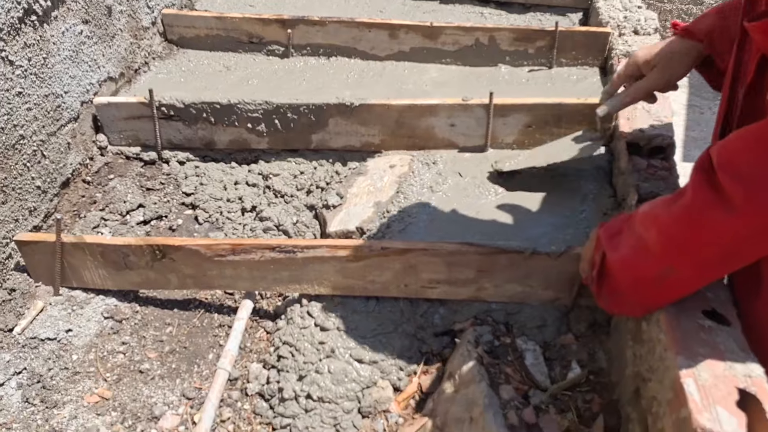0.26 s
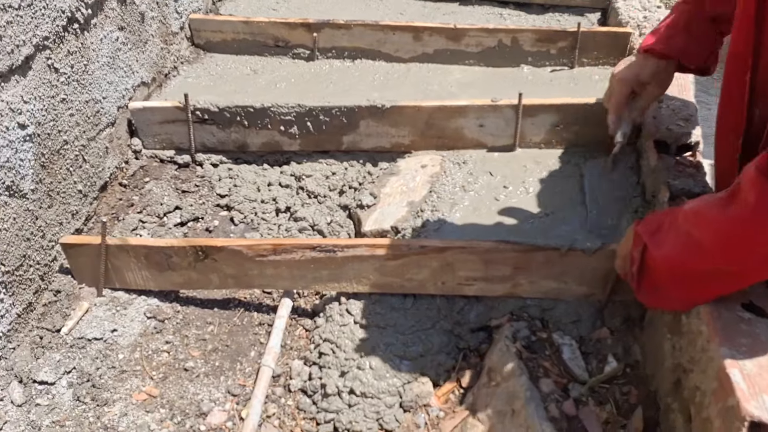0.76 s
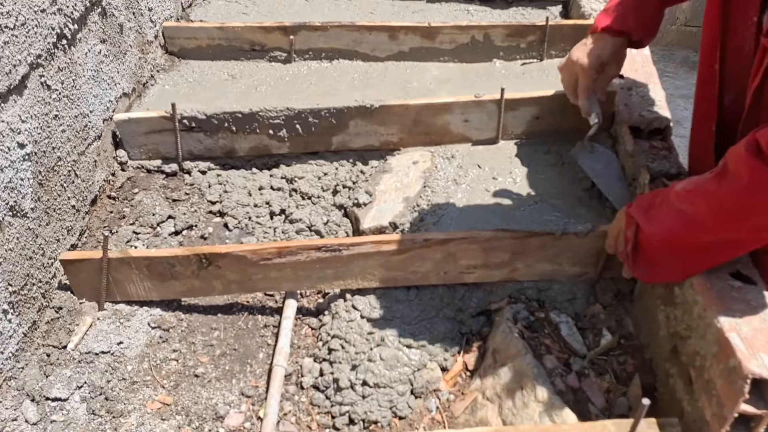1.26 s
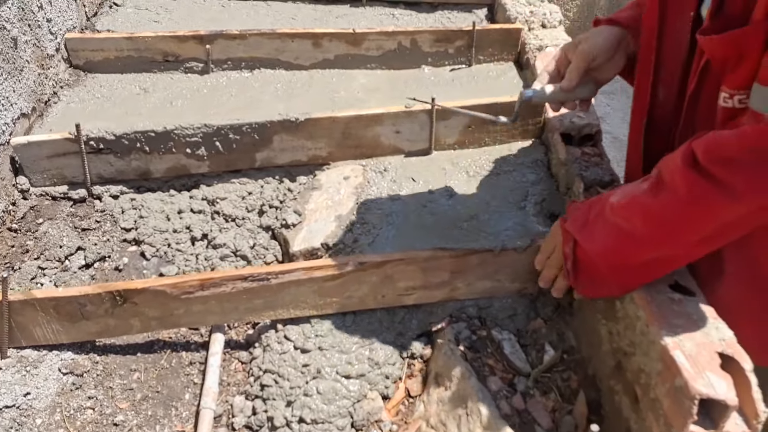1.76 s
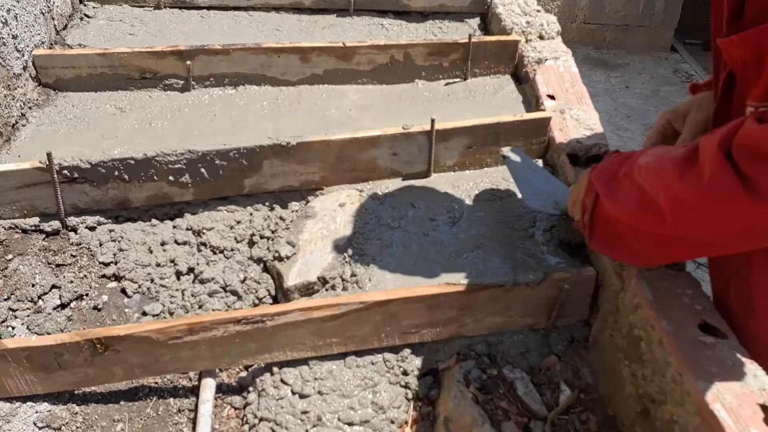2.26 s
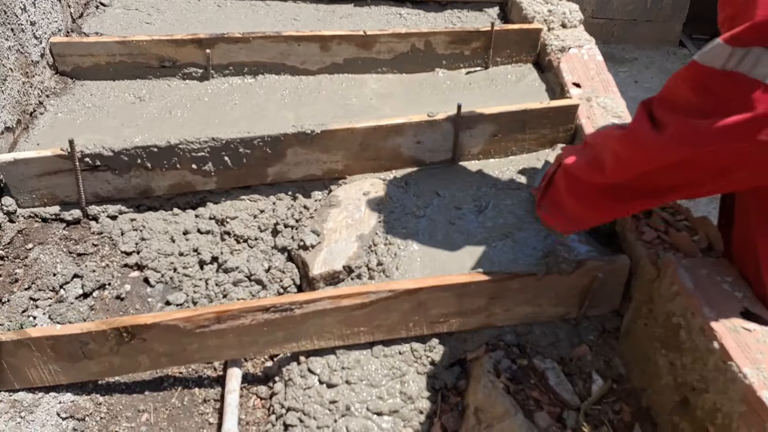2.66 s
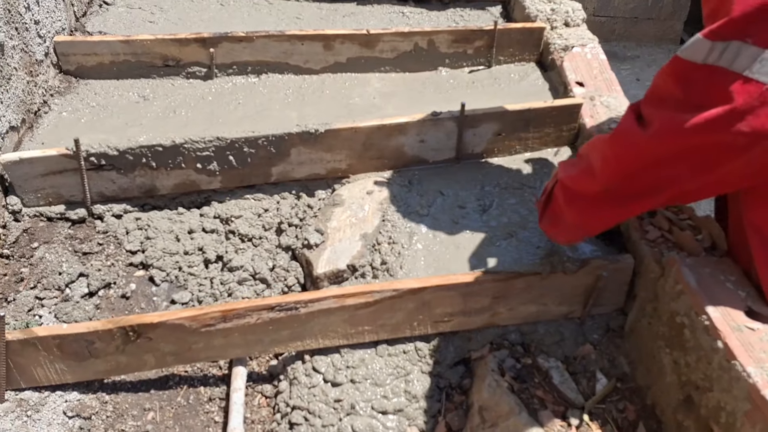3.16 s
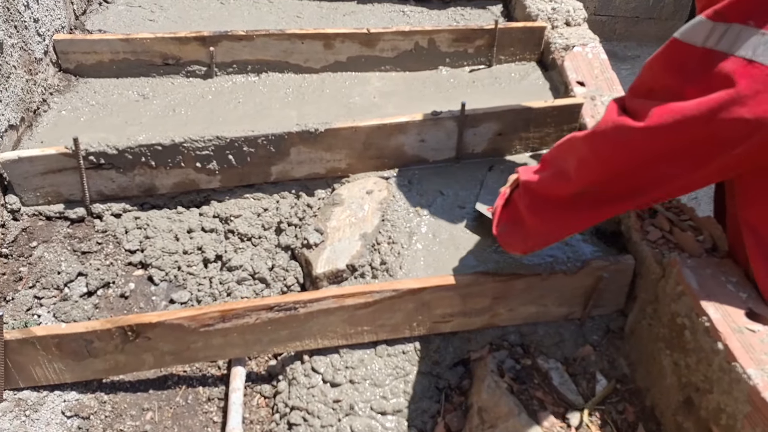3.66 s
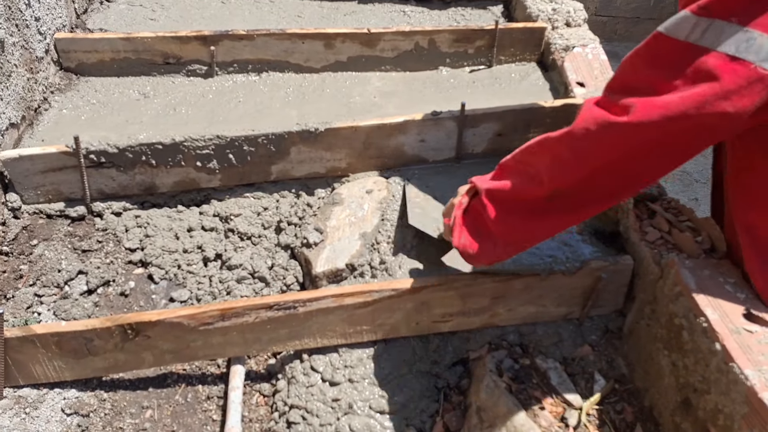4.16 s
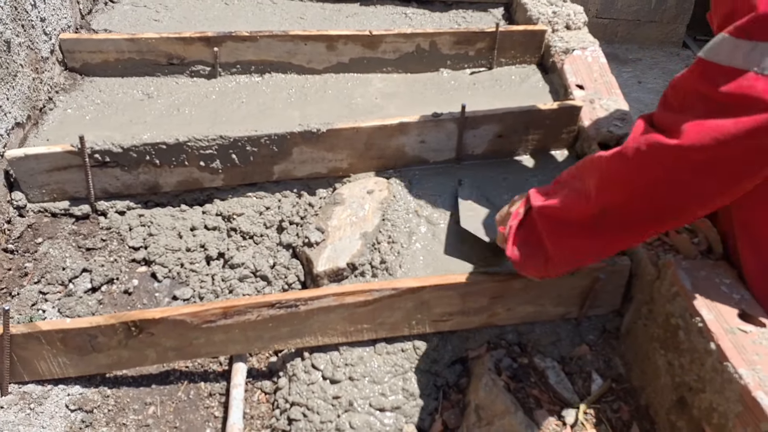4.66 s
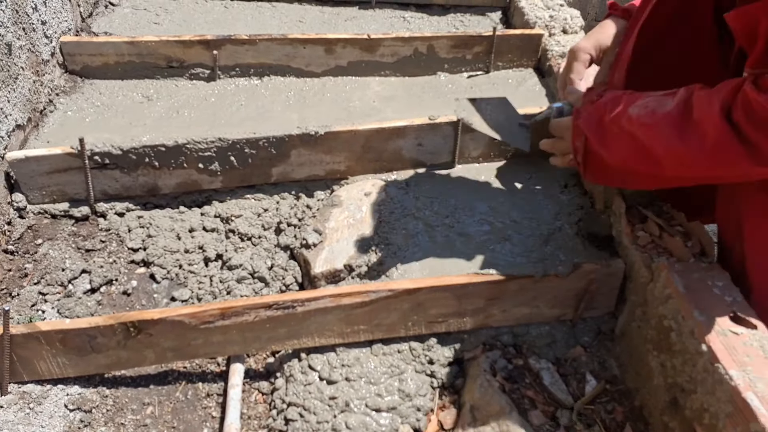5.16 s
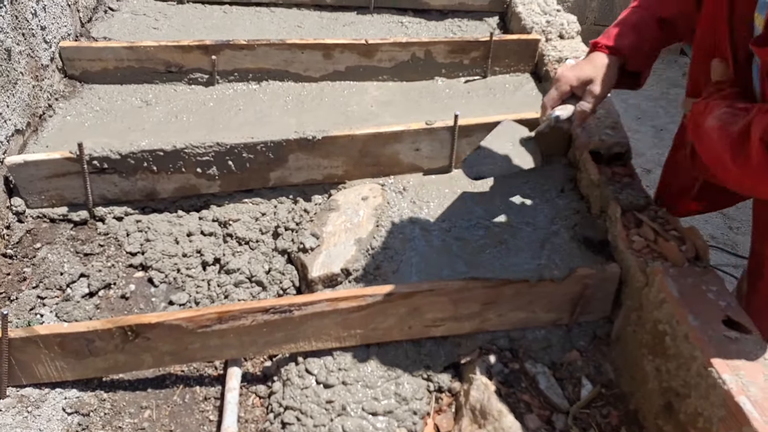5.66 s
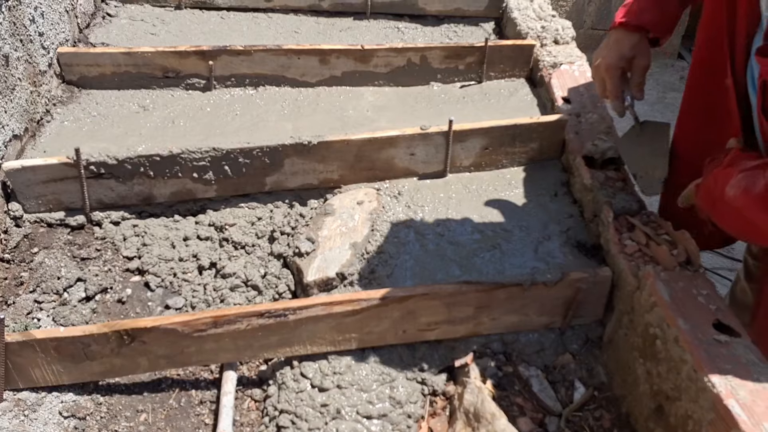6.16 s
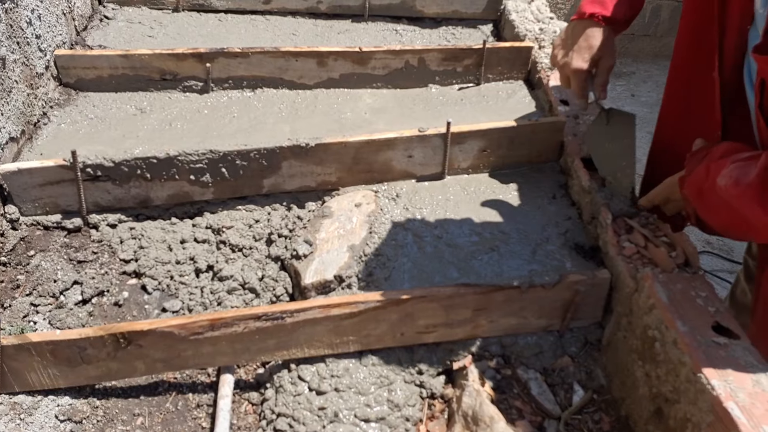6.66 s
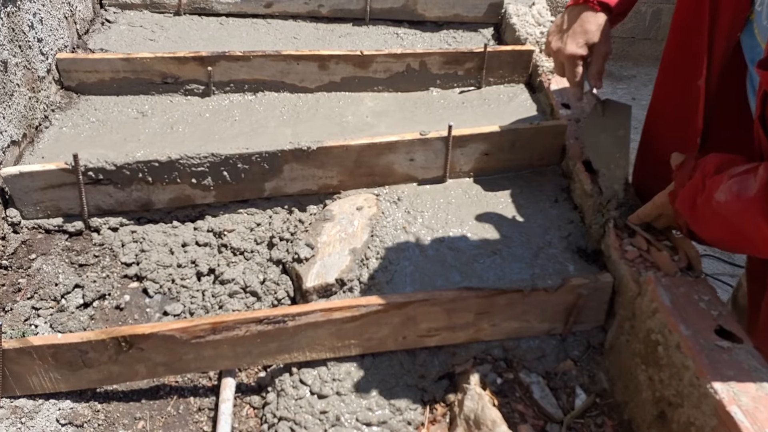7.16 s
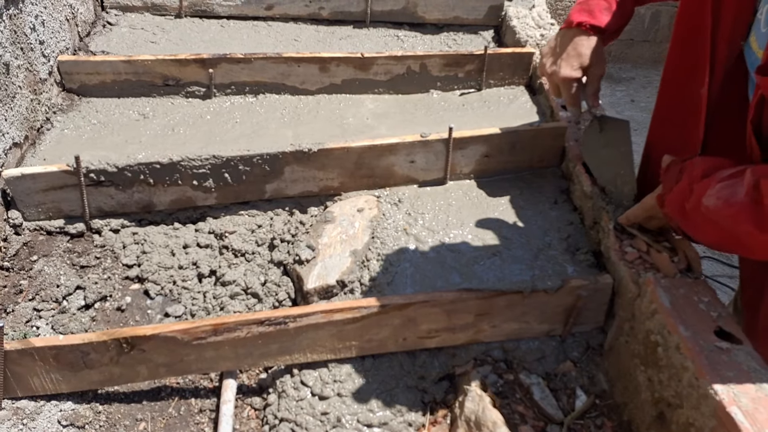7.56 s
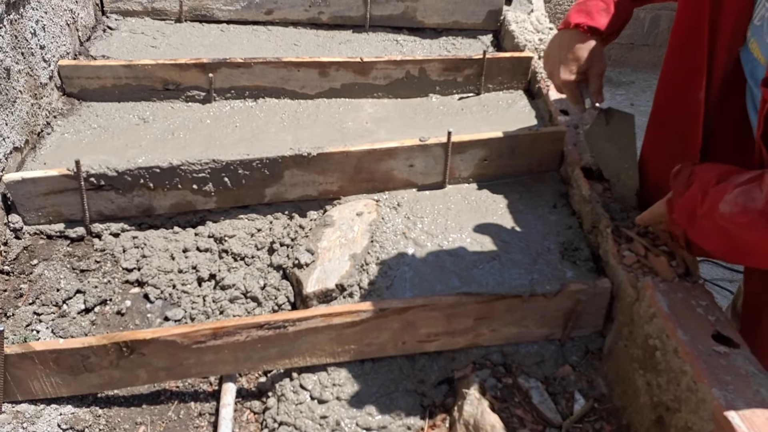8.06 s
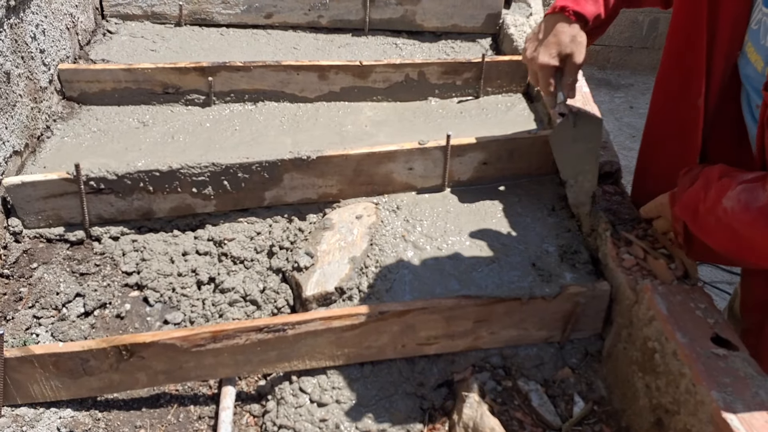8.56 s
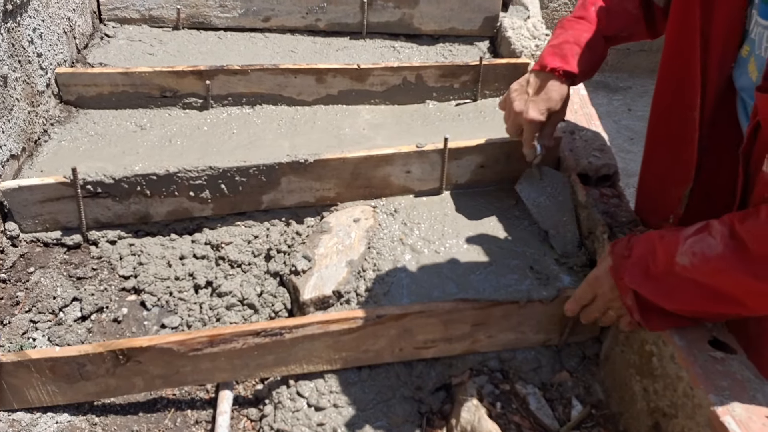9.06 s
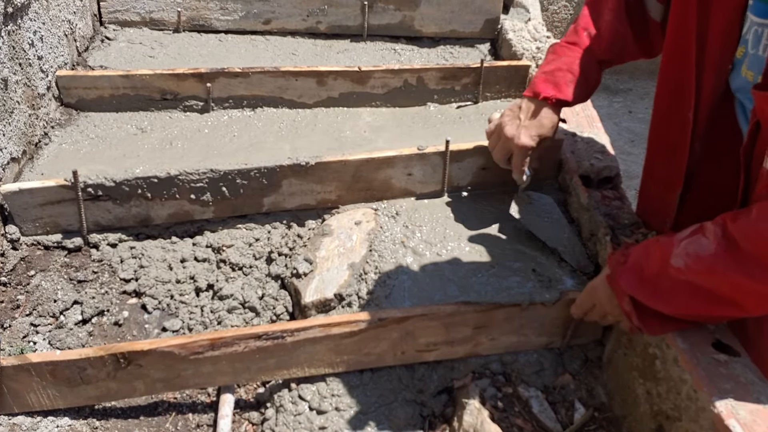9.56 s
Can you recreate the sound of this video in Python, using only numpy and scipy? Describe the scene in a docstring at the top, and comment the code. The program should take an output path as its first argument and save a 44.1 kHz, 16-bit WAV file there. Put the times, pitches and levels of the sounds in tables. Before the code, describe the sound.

A trowel blade works gritty wet mix beside hollow brick on an open building site. Dry, short, uneven scrapes alternate with near-silence: a hard knock first, rattling taps and bright sandy swipes next, a slow rising drag in the middle, stony grinding with hollow resonance later, then soft ringing rubs. The microphones are fairly near, wide in stereo, with a low steady hum, a very thin high whine and soft air noise behind.

```python
"""Outdoors on a building site, a steel trowel spreads wet concrete and scrapes along hollow bricks.
Stones, grit and sand grind as shaped noise under the blade; taps, knocks and light rubbing ring its modes.
Brick cavities ring with each slip of the edge, boards rumble, and dull blows are short damped swings.
Behind the work a distant machine hums and whines with wavering sines over patchy noise of traffic and air."""
import sys
import numpy as np
from scipy import signal
from scipy.fft import rfft, irfft, next_fast_len
from scipy.io import wavfile

SR = 44100
rng = np.random.default_rng(int(sys.argv[2]) if len(sys.argv) > 2 else 0)


def file_out(sig):
    """Save sig as 16-bit WAV at sys.argv[1]."""
    # one column per channel
    cols = np.atleast_2d(sig).T
    # limit, then scale
    lim = np.clip(cols, -1, 1)
    pcm = np.round(lim * 32767).astype(np.int16)
    wavfile.write(sys.argv[1], SR, pcm)


N = 433062   # length [samples]

# the edge meets stones: (time [s], relative level [dB], treble over it [dB], time to fade by 60 dB [s])
TAPS = [(0.722, -6, -10, 0.075), (0.7488, -14, 10, 0.052), (1.046, -25, 1, 0.081), (1.313, -20, -10, 0.054),
        (2.5255, -29.5, 7, 0.033), (2.7806, -23.5, 9, 0.041), (2.797, -6, -11, 0.059),
        (2.9019, -14.5, -4, 0.055), (2.9855, -13, 4.5, 0.038), (3.063, -20.5, -7, 0.08),
        (3.081, -23.5, 4.5, 0.035), (3.154, -13.5, -6, 0.061), (3.245, -23, -3, 0.036),
        (4.5309, -23, -4.5, 0.025), (5.748, -24.5, -12, 0.088), (6.2085, -30.5, 3, 0.14),
        (7.538, -27.5, -22, 0.045), (7.6662, -24, -11, 0.027), (9.575, -17, -7.5, 0.042)]
# ringing modes of the steel blade:
# (pitch [Hz], level pressed down [dB], level held loosely [dB], free time to fade by 60 dB [s])
BLADE = [(1180, -3, -12, .15), (1370, -2, -20, .15), (1720, -9, -20, .1), (1950, -4, -20, .1),
         (2300, -5, -11, .1), (2610, -5, -4, .08), (3290, -6, -6, .1), (3700, -6, -10, .1),
         (4130, -6, -8, .1), (4640, -5, -9, .1), (5130, -5, -7, .1), (5750, -8, -14, .1)]
TAP_TILT_DB = -3   # struck modes get weaker by this per octave above 1 kHz
TURN_RAD = 1.305   # phase turn between the two sides


def amp(db):
    """Turn decibels into gain."""
    return np.exp(np.asarray(db) * (np.log(10) / 20))


def rms_one(x):
    """Scale to an rms level of 1."""
    return x / np.sqrt(np.mean(x ** 2) + 1e-20)


def in_time(rows):
    """Read each column of a table whose first column is time, sample by sample."""
    s, *columns = np.transpose(rows)
    return [np.interp(np.arange(N) / SR, s, column) for column in columns]


def at_hz(points, hz):
    """Read a spectrum table along a logarithmic pitch axis."""
    points = np.array(points)
    return np.interp(np.log(hz), np.log(np.maximum(points[:, 0], 1)), points[:, 1])


def colour(x, points):
    """Filter x by the spectrum table, nearly silent beyond its ends, and scale to rms 1."""
    size = next_fast_len(N)
    hz = np.maximum(np.arange(size // 2 + 1) * SR / size, 1)
    below, above = (points[0][0] * .8, -70), (points[-1][0] * 1.15, -70)
    gain = amp(at_hz([below] + list(points) + [above], hz))
    return rms_one(irfft(rfft(x, size) * gain, size)[..., :N])


def drift(rate):
    """Make a slow random curve of rms 1; a higher rate [Hz] wanders faster."""
    step = 40   # samples between its points
    r = np.exp(-2 * np.pi * rate * step / SR)
    noise = rng.standard_normal(N // step + 2002)
    slow = signal.lfilter([1], [1, -2 * r, r * r], noise)[2000:]   # skip the start-up
    return np.interp(np.arange(N) / step, np.arange(len(slow)), rms_one(slow))


def ring(x, hz, t60):
    """Let x strike a resonance: a unit click starts a sine that fades by 60 dB in t60 seconds."""
    r, w = amp(-60 / (t60 * SR)), 2 * np.pi * hz / SR
    return signal.lfilter([0, np.sin(w)], [1, -2 * r * np.cos(w), r * r], x + 1e-18)


def grains(per_s, spread_db):
    """Draw random clicks of uneven size, one shared track and one for each side."""
    sizes = amp(spread_db * np.minimum(rng.exponential(1, (3, N)), 4.5))
    signs = rng.choice([-1, 1], (3, N))
    present = rng.random((3, N)) < per_s / SR
    return rms_one(sizes * signs * present)


def swells(rows):
    """Give the gain of gestures that rise, hold and fall, and the row that began last at each moment."""
    rise_power, fall_power = 0.84, 1.18   # bend of the rise in gain and of the fall in dB
    fall_db = 30   # lost by the end of the fall time
    t, power = np.arange(N) / SR, np.zeros(N)
    for start, rise, hold, fall, db, *_ in rows:
        rise, hold, fall = np.maximum([rise, hold, fall], [.002, 0, .01])
        span = slice(round(start * SR), round((start + rise + hold + 2 * fall) * SR))
        since = np.maximum(t[span] - start, 0)
        fallen_db = fall_db * (np.maximum(since - rise - hold, 0) / fall) ** fall_power
        risen = np.minimum(since / rise, 1) ** rise_power
        power[span] += (risen * amp(db - fallen_db)) ** 2   # overlapping gestures add in power
    rows = np.array(rows)
    latest = np.maximum(np.searchsorted(rows[:, 0], t, side="right") - 1, 0)
    return np.sqrt(power), rows[latest].T


def gliding(rows):
    """Give the gain and phase of gestures whose pitch glides for up to half a second."""
    level, (start, *_, first_hz, glide) = swells(rows)
    hz = first_hz + glide * np.clip(np.arange(N) / SR - start, 0, .5)
    return level, 2 * np.pi * np.cumsum(hz) / SR


def bursts(levels_db, rise_s):
    """Shape each tap as a quick rise and an exponential fall."""
    out = np.zeros(N)
    for (s, _, _, t60), db in zip(TAPS, levels_db):
        first = round(s * SR)
        t = np.arange(min(int(.25 * SR), N - first)) / SR
        out[first:][:len(t)] += amp(db - 60 * t / max(t60, .01)) * (1 - np.exp(-t / rise_s))
    return out


def pressed_blade(x):
    """Grinding excites the damped blade modes, each wavering as the grip and angle change."""
    wet_damping = .35   # share of the ring time left while the blade touches concrete
    rings = 0
    for hz, pressed_db, _, t60 in BLADE:
        rings = rings + amp(pressed_db + 5 * drift(9)) * rms_one(ring(x, hz, t60 * wet_damping))
    return rms_one(rings) * np.sqrt(np.mean(x ** 2))   # as strong as the grinding itself


def scraping():
    """Random clicks of stones, grit and sand grind under uneven pressure; taps add short crunches."""
    # the blade grinds: (start [s], rise [s], hold [s], fall [s], relative pressure [dB],
    # fine sand over it [dB], coarse stones over it [dB])
    strokes = [(0, 0.0014, 0.063, 0.062, -31, 0.5, 0.5), (.075, 0.0089, 0.064, 0.22, -34.5, -3.5, -1.5),
               (.7, 0.028, 0.0079, 0.071, -23.5, -6.5, 0), (.745, 0.049, 0.014, 0.23, -28, -1.5, -2.5),
               (1.04, 0.0037, 0.13, 0.085, -45, 1, 0), (1.305, 0.0035, 0.0028, 0.3, -39, 2, 1),
               (1.34, 0.011, 0.12, 0.21, -49, 2, -12), (1.585, 0.013, 0.015, 0.27, -35, -4.5, -4.5),
               (1.99, 0.02, 0.095, 0.12, -52, -1.5, -23), (2.518, 0.065, 0.079, 0.087, -34.5, 1.34, -2.5),
               (2.772, 0.013, .001, 0.27, -33, 0, -13), (2.98, 0.0085, 0.072, 0.19, -39, -1.5, -7),
               (3.04, 0.043, 0.05, 0.035, -40, 0.5, -8), (3.14, 0.0066, 0.22, 0.32, -45, -1, -2.5),
               (3.42, 0.057, 0.036, .1, -30, 0, -4), (3.49, 0.053, 0.01, 0.12, -21.5, 0.5, -8),
               (3.6, 0.026, 0.042, 0.031, -38.5, 0.5, -7), (3.82, 0.014, 0.021, 0.25, -37.5, -18, 11.5),
               (3.885, 0.076, 0.044, 0.1, -32.5, 2, 3.5), (3.95, 0.022, 0.036, 0.21, -24, 1, -10),
               (4.05, 0.035, 0.065, 0.02, -36, 1.5, 0), (4.335, 0.019, 0.01, 0.14, -42, -11, 6.5),
               (4.525, 0.07, 0.066, 0.043, -33.5, 1, -1.5), (5.25, 0.034, 0.018, 0.23, -51, -2, -1),
               (5.69, 0.22, .001, .27, -20.5, -3.5, 0.5), (6.6, 0.047, 0.059, 0.15, -52, 1.5, 6),
               (6.885, 0.019, .001, 0.17, -45, 0.5, 7.5), (6.99, 0.031, 0.029, 0.15, -36.5, -9, -2),
               (7.09, 0.034, .001, 0.18, -28.5, -9, 9.5), (7.17, 0.07, 0.0011, 0.25, -30, -5.5, 4.5),
               (7.44, 0.031, 0.008, 0.055, -42, 1, -2.5), (7.65, 0.039, 0.0019, 0.12, -40, -0.5, -3),
               (7.97, 0.0086, 0.024, 0.11, -37, -2, 4), (8.02, 0.091, .001, 0.41, -24, -4, 1),
               (8.13, 0.066, .001, 0.24, -18.5, -4.5, -0.5), (8.27, 0.051, .001, 0.14, -24.5, -6.5, -2.5),
               (8.865, 0.01, 0.13, 0.24, -49, 1, -33), (9.025, 0.028, 0.05, 0.078, -33, 0, -20),
               (9.31, 0.012, .001, 0.17, -45, 0, -3.5), (9.41, 0.033, 0.096, 0.1, -40, -4, 0),
               (9.57, 0.0032, .001, 0.19, -42, 0.5, -4)]
    # spectrum of the grit: (pitch [Hz], level per Hz [dB])
    grit_points = [(650, -14), (1100, -5), (1660, 2.5), (2480, 9), (3300, -2), (4290, -4), (7260, -120)]
    # spectrum of the sharp grit: (pitch [Hz], level per Hz [dB])
    sharp_points = [(3000, -19), (4030, -4.5), (4780, -0.5), (6100, -0.5), (7600, -46.5)]
    # spectrum of the fine sand: (pitch [Hz], level per Hz [dB])
    sand_points = [(3710, -4), (6300, -7.5), (9840, -9.5), (13700, -7.5), (15600, -9)]
    # spectrum of the coarse stones: (pitch [Hz], level per Hz [dB])
    stone_points = [(330, -15.5), (500, -4), (1300, -2), (1690, 3), (2860, -120)]
    flat_from_s, flat_to_s = 2.4, 5.5   # strokes begun in this span lie flat on the wet mix
    flat_sharp_db = 5.0   # flat strokes have stronger sharp grit

    pressure, (start, *_, sand_db, stone_db) = swells(strokes)
    flat = (start > flat_from_s) & (start < flat_to_s)
    sharp_db = -1.5 + sand_db + flat_sharp_db * flat   # sharp grit comes with fine sand
    _, tap_db, treble_db, _ = np.array(TAPS).T
    stroke = pressure * amp(-7.5 + 0.84 * drift(43))   # lumpy contact
    contact = stroke + bursts(tap_db - 12, rise_s=0.013)

    crushed = grains(7000, 3.3)
    grit = colour(crushed, grit_points) * amp(2.5 * drift(40))
    sharp = colour(crushed, sharp_points) * amp(sharp_db + 2.5 * drift(15))
    rubbed = (grit + sharp) * contact
    ringing = amp(-5) * pressed_blade(rubbed)

    sand = colour(grains(9000, 3.5), sand_points)
    dull = signal.lfilter(*signal.butter(2, 9500, fs=SR), sand)
    # where sand is scarce, the finest grains are scarcest
    sand = dull + (sand - dull) * amp(1.83 * sand_db)
    sand_bursts = bursts(tap_db + treble_db - 9, rise_s=0.000076)
    sand = sand * (stroke * amp(sand_db) + sand_bursts)

    stones = colour(grains(2500, 2.4), stone_points) * contact
    stones = stones * amp(stone_db + 2.23 * drift(22.7))
    return rubbed + ringing + sand + stones


def struck_blade():
    """Each tap strikes every mode of the blade by a random strength, and contact damps the ring."""
    ring_db, spread_db = -15, 5.5   # level offset and random spread of each mode
    damping = .4   # share of the ring time left
    s, db = np.array(TAPS).T[:2]
    chance, out = rng.standard_normal((len(s), len(BLADE))), 0
    for (hz, pressed_db, _, t60), luck in zip(BLADE, chance.T):
        tilt_db = TAP_TILT_DB * np.log2(hz / 1000)
        clicks = np.zeros(N)
        clicks[(s * SR).astype(int) + 40] = amp(db + pressed_db + ring_db + tilt_db + spread_db * luck)
        out = out + ring(clicks, hz, t60 * damping)
    return signal.lfilter(*signal.butter(2, 800, "high", fs=SR), out)


def clinks():
    """Each clean knock on the lifted blade leaves a few modes ringing as fading sines."""
    # (time [s], relative level of a mode at 1 kHz [dB], ring time over the mode's own [times],
    # pitches struck [Hz])
    knocks = [(.722, -20, .9, (1890, 2390)), (1.311, -29, .4, (1370, 1950, 2300)),
              (4.343, -42, 3.6, (1165, 1378, 1770, 2400, 3190)), (4.528, -29, .4, (3700, 4640, 5600)),
              (4.62, -40, 2.8, (1240,)), (6.2105, -31, .5, (1140, 1690, 3660, 4300, 5730))]
    out, t = np.zeros(N), np.arange(int(.3 * SR)) / SR
    for s, db, longer, struck in knocks:
        for hz in struck:
            nearest = min(BLADE, key=lambda mode: abs(mode[0] - hz))
            t60 = longer * nearest[3]
            fade = amp(db + TAP_TILT_DB * np.log2(hz / 1000) - 60 * t / t60)
            tone = np.sin(2 * np.pi * (hz * t + rng.random()))
            out[round(s * SR):][:len(t)] += fade * tone * np.minimum(t / 0.0029, 1)
    return out


def singing():
    """Light rubbing keeps the loosely held blade sounding; bending glides its wavering lowest mode."""
    # (start [s], rise [s], hold [s], fall [s], relative level [dB], lowest pitch [Hz], glide [Hz/s])
    songs = [(7.655, 0.01, 0.091, 0.06, -53, 1177, 1), (8.862, 0.029, 0.11, .12, -49.5, 1190, 25),
             (9.025, 0.04, 0.033, 0.15, -42, 1225, 27)]
    level, phase = gliding(songs)
    rubbing = grains(900, 3.0)
    r = amp(-60 / (.07 * SR))
    # slow strength and phase of the lowest mode, as one complex signal
    swell = signal.lfilter([1], [1, -r], rubbing[0] + 1j * rubbing[1])
    steady = .4 * np.std(swell)
    lowest = rms_one(np.real((swell + steady) * np.exp(1j * phase)))
    upper = 0
    for hz, _, loose_db, t60 in BLADE:
        upper = upper + amp(loose_db + 3 * drift(20)) * rms_one(ring(rubbing[2], hz, t60))
    return level * (lowest + upper)


def hollow():
    """Slips of the edge excite the air cavities of the brick, and the boards rumble along."""
    # (start [s], rise [s], hold [s], fall [s], relative level [dB], rumble of the boards over it [dB])
    rubs = [(0, 0.0054, 0.099, 0.22, -48, 2.5), (.645, 0.023, 0.11, 0.23, -41, -3),
            (3.325, 0.01, 0.043, 0.085, -39.5, -12), (3.81, 0.019, 0.0011, 0.21, -39.5, -4),
            (5.8, 0.24, 0.042, 0.11, -37, -3.5), (6.99, 0.044, 0.27, 0.13, -31, -14.5),
            (7.893, 0.0056, 0.0092, 0.29, -40.5, 2), (8.0, 0.23, .03, 0.24, -46.5, 5.5),
            (9.408, 0.003, 0.1, 0.17, -35.5, -6)]
    # air cavities of the brick: (pitch [Hz], width [Hz], relative level [dB])
    cavity_modes = [(276, 21, -7), (356, 39, 7), (571, 56, 0)]
    level, (*_, rumble_db) = swells(rubs)
    slips = grains(350, 3.6)
    cavity = 0
    for hz, width, db in cavity_modes:
        cavity = cavity + amp(db + 0.47 * drift(13.0)) * rms_one(ring(slips[0], hz, 1.6 / width))
    cavity = colour(cavity, [(190, -3.0), (900, -6.5)])
    rumble = colour(slips[1], [(40, -7), (70, 11.0), (220, 3.5)])
    return level * (cavity + amp(rumble_db) * rumble)


def thuds():
    """Each dull blow on boards or brick is a low damped swing with a short rough knock of noise."""
    # (time [s], relative level [dB], pitch [Hz], time to fade by 60 dB [s], relative knock level [dB])
    blows = [(0.723, -15, 109.5, 0.12, -32), (0.745, -18, 93, 0.14, -34), (2.567, -26, 494, 0.032, -43),
             (7.897, -10, 149, 0.022, -20.5), (9.414, -22, 70, 0.17, -21)]
    out, t = np.zeros(N), np.arange(int(.3 * SR)) / SR
    for s, db, hz, t60, knock_db in blows:
        rough = signal.lfilter(*signal.butter(2, 900, fs=SR), rng.standard_normal(len(t)))
        knock = rough * amp(knock_db - 60 * t / 0.18)
        fade = amp(-60 * t / max(t60, .02)) * (1 - np.exp(-t / 0.0031))
        swing = np.sin(2 * np.pi * hz * t) * fade
        out[round(s * SR):][:len(t)] += amp(db) * swing + knock
    return out


def boom():
    """Soft low sines swell and sag in pitch."""
    # (start [s], rise [s], hold [s], fall [s], relative level [dB], first pitch [Hz], glide [Hz/s])
    low_tones = [(2.82, 0.064, 0.033, 0.19, -34.5, 103.1, -150),
                 (7.094, 0.0183, 0.0053, 0.034, -12, 361, -100)]
    level, phase = gliding(low_tones)
    return level * np.sin(phase)


def whistles():
    """Noise through narrow resonances makes breathy tones that swell and fade."""
    # the low ones lie under scrapes: (start [s], end [s], pitch [Hz], relative level [dB])
    breathy_tones = [(4.84, 5.2, 2820, -55), (5.16, 5.25, 2190, -56), (5.736, 5.913, 720, -32),
                     (6.6, 6.745, 4720, -52), (7.11, 7.22, 280, -30), (7.797, 7.83, 1200, -46)]
    out, air, flutter_db = np.zeros(N), rng.standard_normal(N), 1.6 * drift(25)
    for start, end, hz, db in breathy_tones:
        span = slice(round(start * SR), round(end * SR))
        tone = rms_one(ring(air, hz, min(0.049, 60.0 / hz)))[span]
        fade = np.hanning(span.stop - span.start) ** .5
        out[span] += amp(db + flutter_db[span]) * tone * fade
    return out


def whine():
    """Thin sines of the machine drift together in pitch; each wavers in strength on each side."""
    # the lines: (pitch before the drift [Hz], level relative to the strongest [dB])
    lines = [(4694, -6), (4755, -6), (5292, -5), (5355, -6), (5953, -5), (6016, 0), (6078, -4)]
    # the strongest line: (time [s], pitch [Hz], relative level [dB])
    strongest_line = [(0, 6011, -65), (5.2, 6016, -62), (9.82, 6021, -66)]
    top_hz, level_db = in_time(strongest_line)
    strongest_hz = max(lines, key=lambda line: line[1])[0]
    turns = np.cumsum(top_hz) / SR / strongest_hz   # turns per Hz of a line's pitch
    out = np.zeros((2, N))
    for hz, db in lines:
        waver_db = 2.5 * np.array([drift(3), drift(3)])
        phase = 2 * np.pi * (hz * turns + rng.random()) + [[0], [TURN_RAD]]
        out += amp(level_db + db + waver_db) * np.sin(phase)
    return out * amp([[-1], [2]])   # left, right


def site():
    """Far traffic and air are patchy noise, and the machine's hum is a sine wavering in pitch and level."""
    # level of the site noise before its flicker: (time [s], level [dB])
    noise_level = [(0, -51), (6.7, -51.5), (9.82, -51)]
    # spectrum of the site noise: (pitch [Hz], level per Hz [dB])
    noise_points = [(36, -18), (60, -10), (123, -14), (180, -21), (530, -28), (1300, -32.5), (4000, -35.5),
                    (5800, -33.5), (6500, -42.5), (16300, -50.5)]
    hum_hz, hum_db = 119, -51.5   # centres of the wavering
    level_db = in_time(noise_level)[0]
    air = colour(rng.standard_normal((3, N)), noise_points) * amp(level_db + 0.4 * drift(5.0))
    hum_phase = 2 * np.pi * np.cumsum(hum_hz + 1.42 * drift(1.58)) / SR
    hum = np.sin(hum_phase) * amp(hum_db + 1.5 * drift(4.7))
    return air + hum * [[1], [0], [0]]   # the hum is in the shared track only


def microphones(draws):
    """Lows reach both sides alike; higher up a share arrives turned and late, the rest is each side's own."""
    # balance of the sides: (pitch [Hz], left over right [dB])
    balance = [(60, 6), (170, -5.5), (400, 0), (1300, -3), (4400, -8.5), (7500, 5.5), (15000, -1)]
    alike_below_hz, lag_above_hz, right_lag_s = 393, 1766, 0.000578
    common = .4   # share of the treble's power common to both sides
    size = next_fast_len(N + 200)
    hz = np.maximum(np.arange(size // 2 + 1) * SR / size, 1)
    shared, left, right = rfft(draws, size)
    apart = 1 / (1 + (alike_below_hz / hz) ** 4)   # 0 in the lows, 1 in the treble
    own = np.sqrt(np.maximum(apart, .08) * (1 - common))
    lag_s = right_lag_s / (1 + (lag_above_hz / hz) ** 4)
    late = np.exp(-1j * (TURN_RAD * apart + 2 * np.pi * hz * lag_s))
    tilt = amp(at_hz(balance, hz) / 2)
    both = np.sqrt(1 - own ** 2) * shared
    left_side = (both + own * left) * tilt
    right_side = (both * late + own * right) / tilt
    # unlike sides add in power, so each carries more of the sound
    sides = np.array([left_side, right_side]) * np.sqrt(1 + apart)
    return irfft(sides, size)[:, :N]


def scene():
    """Send most sources through the microphone pair and add the whine and the free blade in stereo."""
    single = hollow() + thuds() + boom() + struck_blade() + whistles()
    single = single * [[1], [.4], [.4]]   # shared, left, right
    through_pair = microphones(scraping() + single + site())
    free_blade = (clinks() + singing()) * amp([[-1.5], [1.5]])   # left, right
    return through_pair + whine() + free_blade


def record(dry):
    """Round the peaks softly and cut the top steeply."""
    ceiling = .8   # full scale is 1
    cutoff_hz = 16600   # from here up at least 70 dB are lost
    rounded = ceiling * np.tanh(dry / ceiling)
    return signal.sosfilt(signal.cheby2(12, 70, cutoff_hz, fs=SR, output="sos"), rounded)


dry = scene()
out = record(dry)
file_out(out)
```